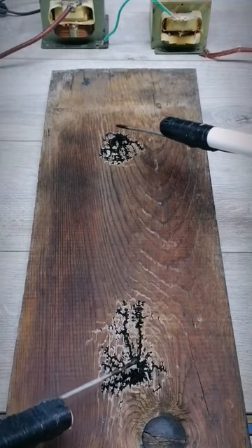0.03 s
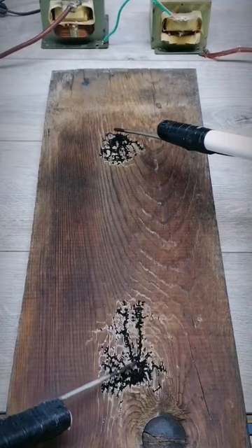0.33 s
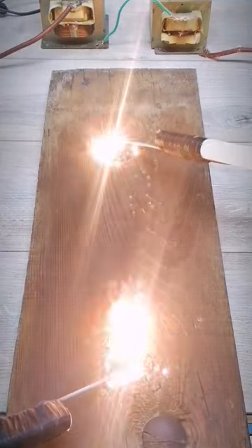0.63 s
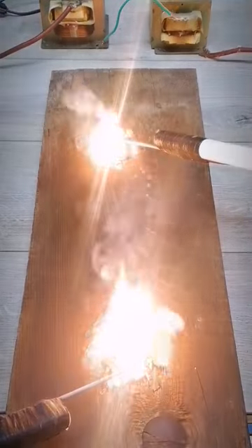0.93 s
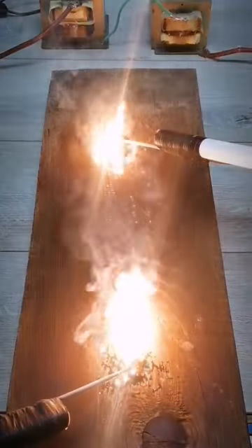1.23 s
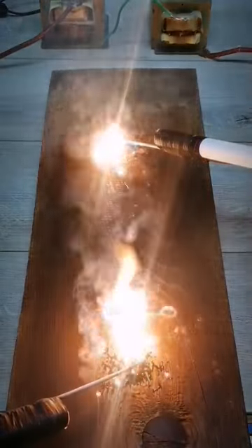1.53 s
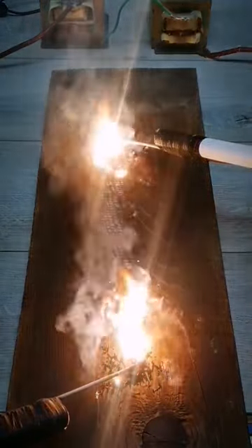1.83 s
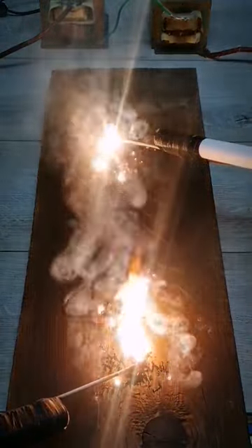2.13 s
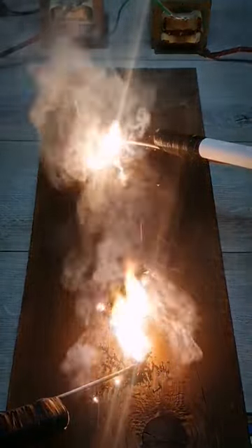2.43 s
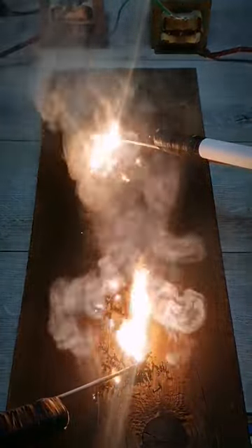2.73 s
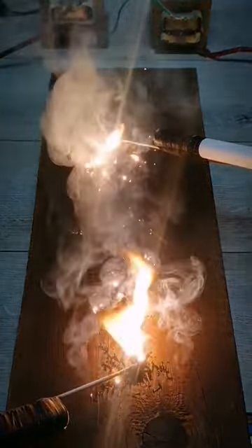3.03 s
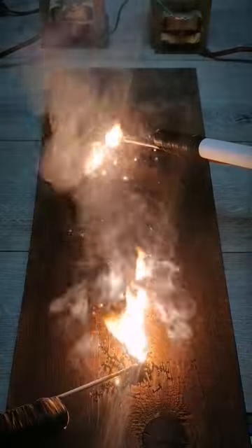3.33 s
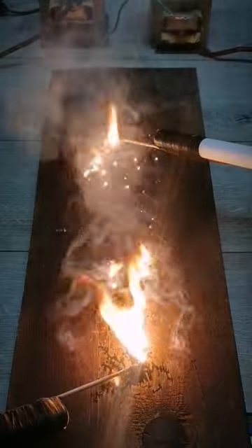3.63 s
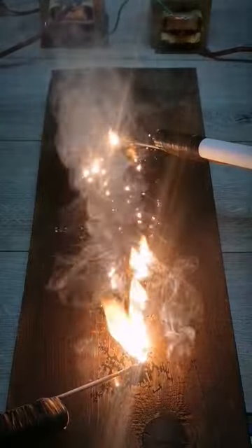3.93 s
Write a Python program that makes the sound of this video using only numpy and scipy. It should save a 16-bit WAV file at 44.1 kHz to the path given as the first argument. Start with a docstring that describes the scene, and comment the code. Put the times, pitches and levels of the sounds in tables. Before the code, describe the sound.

An electric arc burns a wooden board in a small workshop. At first there is only a faint transformer hum, with a few sparks at 0.6 seconds. At 0.8 seconds the arc strikes with sharp pops, which thin out by 1.5 seconds. A deep buzz, pulsing crackle and sizzle continue until the end at about 4 seconds, with soft gushes of burning gas between 2.2 and 3.1 seconds.

```python
"""A faint transformer hum and a few sparks from a probe come first, in a small workshop.
Then a high-voltage arc strikes a wooden board, and pockets of gas burst in a run of pops.
The arc flares on every half cycle of the mains, heating the air into a deep buzz and tearing at
the wood with a pulsing crackle. Boiling sap sizzles, and jets of burning gas gush now and then."""
import sys
import numpy as np
from scipy import signal
from scipy.fft import rfft, irfft
from scipy.io import wavfile

SR = 44100
rng = np.random.default_rng(int(sys.argv[2]) if len(sys.argv) > 2 else 0)


def to_wav(sig):
    """Store sig (one row per channel, or 1-D mono) as 16-bit WAV at the path in sys.argv[1].

    Samples outside -1..1 are clipped; the rate is SR.
    """
    pcm = np.clip(np.atleast_2d(sig), -1, 1) * 32767
    pcm = np.round(pcm).astype(np.int16)
    wavfile.write(sys.argv[1], SR, pcm.T)  # frames by channels


N = 176400
T = np.arange(N) / SR

MAINS_HZ = 50
STRIKE_S, CATCH_S, BUZZ_RISE_S = 0.815, 0.0066, 0.083  # the strike; rise times of burning and buzz
FLARE_S, CRACKLE_LAG_S = 0.0057, 0.000092  # place of the flare in each half cycle; the crackle follows

# strength of the arc (time [s], relative level [dB])
ARC_LEVEL = [(0.86, -34.5), (0.88, -47.5), (0.93, -40), (1.0, -43), (1.47, -37), (1.67, -39), (1.72, -44),
             (2.19, -42.5), (2.98, -43.5), (3.79, -46), (3.97, -45)]
# strength of the wood's crackling (time [s], relative level [dB])
BURN_LEVEL = [(.82, -43), (.85, -40.5), (.88, -49), (.92, -48), (1.0, -47.5), (1.07, -48), (1.17, -47.5),
              (1.25, -51), (1.45, -43.5), (1.59, -46.5), (1.77, -55), (2.03, -51.5), (2.36, -55),
              (2.39, -51.5), (2.56, -48), (2.7, -52), (2.77, -53.5), (2.88, -50), (3.08, -50), (3.3, -53.5),
              (3.7, -53.5), (4, -50.5)]
# strength of the sizzle and ticks (time [s], relative level [dB])
SIZZLE_LEVEL = [(0.83, -49.5), (1.03, -56), (1.07, -51), (1.27, -56), (1.29, -49), (1.32, -51), (1.51, -49),
                (1.8, -55.5), (1.83, -52.5), (1.96, -52.5), (2.05, -55), (2.29, -56.5), (2.41, -52.5),
                (2.44, -55.5), (2.8, -56), (3.07, -56), (3.14, -52), (3.23, -53), (3.28, -54.5),
                (3.52, -54.5), (3.65, -57), (3.98, -56)]


def amp(db):
    """Amplitude ratio of a level in decibels."""
    return 10 ** (np.asarray(db) / 20)


def unit(x):
    """Normalisation to rms 1."""
    return x / np.sqrt(np.mean(x ** 2) + 1e-20)


def curve(points):
    """Linear interpolation of a time table at every sample."""
    return np.interp(T, *np.transpose(points))


def read(points, hz):
    """Interpolation of a table on a logarithmic frequency axis."""
    f, value = np.transpose(points)
    return np.interp(np.log(hz + 1), np.log(f + 1), value)


def drift(hz):
    """Low-pass noise of rms 1: a random fluctuation up to the given rate."""
    f = np.fft.rfftfreq(N, 1 / SR)
    return unit(irfft(rfft(rng.standard_normal(N)) / (1 + (f / hz) ** 4), N))


def colour(x, points, size=4096):
    """Minimum-phase filtering with the given spectrum."""
    log_gain = np.log(amp(read(points, abs(np.fft.fftfreq(size, 1 / SR)))))
    taps = np.fft.ifft(np.exp(np.conj(signal.hilbert(log_gain)))).real[:size // 2]
    return signal.oaconvolve(np.atleast_2d(x), taps[None], axes=1)[:, :N]


def resonate(x, hz, width):
    """A damped resonator of peak gain 1 whose natural frequency may move."""
    turn = np.exp(2j * np.pi * np.cumsum(hz * np.ones(N)) / SR)
    pole = np.exp(-np.pi * width / SR)
    return 2 * (turn * signal.lfilter([1 - pole], [1, -pole], x / turn + 1e-18)).real


def diffuse(pair):
    """Diffuse field: two independent signals become partly coherent at low frequencies."""
    # likeness of left and right (frequency [Hz], coherence [0-1])
    coherence = [(20, 0.19), (50, 0.25), (100, 0.67), (300, 0.39), (600, 0.36), (1200, 0.32), (3000, 0),
                 (15000, 0)]
    size = pair.shape[1]
    a, b = rfft(pair)
    alike = read(coherence, np.fft.rfftfreq(size, 1 / SR))
    mid, side = a * np.sqrt((1 + alike) / 2), b * np.sqrt((1 - alike) / 2)
    return irfft(np.array([mid + side, mid - side]), size)


def workshop(x, near_db, tail_db, near_s=0.0015, size=16384):
    """Room response: direct sound, early reflections from board and bench, and short reverberation."""
    # reverberation of the room (frequency [Hz], time to fall 60 dB [s])
    decay_times = [(150, 0.34), (800, 0.15), (3000, 0.24), (9000, 0.29), (15000, 0.16)]
    t = np.arange(size) / SR
    near = diffuse(rng.standard_normal((2, size)) * np.exp(-t / near_s) * (t > near_s / 10))
    hz, age, bands = signal.stft(rng.standard_normal((2, size)), SR, nperseg=256)
    decay = amp(-60 * age / read(decay_times, hz)[:, None])
    tail = signal.istft(bands * decay, SR, nperseg=256)[1][:, :size]
    tail = diffuse(tail * np.minimum(t / 0.0048, 1))
    paths = (t == 0) + amp(near_db) * near / np.linalg.norm(near[0])
    paths += amp(tail_db) * tail / np.linalg.norm(tail[0])
    return signal.fftconvolve(np.atleast_2d(x), paths / np.linalg.norm(paths.mean(0)), axes=1)[:, :N]


def hopping(grains, spectrum, near_db, tail_db, near_s, count=3):
    """Multipath: the discharge hops between spots on the board, each with its own reflections."""
    spot = rng.integers(0, count, N)
    arrivals = sum(workshop(grains * (spot == k), near_db, tail_db, near_s) for k in range(count))
    return unit(colour(arrivals, spectrum))


def lit(rise_s):
    """Linear onset from 0 to 1 as the arc strikes."""
    return np.clip((T - STRIKE_S) / rise_s, 0, 1)


def flares(depth_db):
    """Amplitude modulation with one swell in every half cycle of the mains."""
    return amp(depth_db * np.cos(2 * np.pi * 2 * MAINS_HZ * (T - FLARE_S - CRACKLE_LAG_S)))


def snaps(per_s, spread_db):
    """Poisson process of tiny discharges, a few much larger than the rest."""
    size = amp(spread_db * np.minimum(rng.exponential(1, N), 4.5))
    return size * rng.choice([-1., 1.], N) * (rng.random(N) < per_s / SR)


def background():
    """Transformers hum at even mains harmonics until the arc loads them; the room rumbles throughout."""
    # idle hum (multiple of the mains frequency, level [dB])
    harmonics = [(4, -65.5), (6, -62.5), (8, -78), (12, -83.5), (16, -80.5), (20, -77.5), (22, -86),
                 (26, -96.5)]
    # ambient noise (frequency [Hz], relative level [dB])
    room_tone = [(20, 5.5), (55, 0.5), (90, -4), (150, -6.5), (250, -11.5), (400, -10.5), (700, -19),
                 (1000, -21), (1500, -27), (3000, -28.5), (6000, -34), (15000, -43.5)]
    hum = sum(amp(db + 0.5 * drift(6.6)) * np.cos(2 * np.pi * (round(k) * MAINS_HZ * T + rng.random()))
              for k, db in harmonics)
    air = unit(colour(diffuse(rng.standard_normal((2, N))), room_tone))
    return np.sqrt(2) * hum * (1 - lit(BUZZ_RISE_S)) + amp(-56.5) * air


def sparks():
    """Impulsive excitation: bright spits as the probe finds the wood set its metal ringing briefly."""
    # single sparks (time [s], relative level [dB], decay time [s])
    spits = [(0.611, -41, 0.0009), (0.6197, -48, 0.0016), (0.6255, -57, 0.0047), (0.6305, -57.5, .005),
             (0.64, -65, .004), (0.8133, -35, 0.00017), (0.833, -50, 0.001), (0.8358, -44, 0.0005)]
    # colour of a spark (frequency [Hz], gain [dB])
    spectrum = [(590, -34), (1000, -4), (1560, -11), (2530, -9), (4310, -6), (4890, -14), (5230, -0.5),
                (7260, -1), (15000, -10.5)]
    # modes of the probe (frequency [Hz], bandwidth [Hz], gain [dB])
    modes = [(2560, 120, -7), (3090, 64, -3), (4320, 150, 0), (5400, 63, 2), (6700, 300, -5),
             (7660, 130, 2), (9430, 130, -1)]
    envelope = sum(amp(db) * (T >= start) * np.exp(-abs(T - start) / decay) for start, db, decay in spits)
    spit = envelope * rng.standard_normal(N)
    ring = sum(amp(db) * resonate(spit, hz, width) for hz, width, db in modes)
    return amp(9.5) * workshop(colour(spit, spectrum) + ring, near_db=4, tail_db=1)


def roar():
    """Modulated low noise: the flame pushes the air unevenly from flare to flare."""
    # colour of the flame (frequency [Hz], relative level [dB])
    spectrum = [(30, -10), (80, -23), (112, 5), (133, 11), (175, -2), (230, 3), (330, -3.5), (600, -10),
                (2000, -57.5), (15000, -64)]
    puffs = colour(rng.standard_normal(N) * flares(depth_db=-1.5), spectrum)
    return amp(-14) * unit(puffs) * amp(curve(ARC_LEVEL)) * lit(CATCH_S)


def gushes():
    """Jet noise: burning gas swells and fades, with a throaty flutter at the flare rate."""
    # Gaussian swells (peak time [s], standard deviation [s], level [dB])
    swells = [(2.204, 0.061, -58), (2.59, 0.11, -52), (2.915, .045, -58.5), (3.1, 0.048, -58.5)]
    # colour of a jet (frequency [Hz], relative level [dB])
    spectrum = [(100, -42), (450, -4), (620, -9), (760, 4), (900, -4), (1030, -2), (1300, -8), (1900, -21),
                (2450, -13), (3200, -26), (15000, -56)]
    envelope = sum(amp(db) * np.exp(-0.5 * ((T - peak) / width) ** 2) for peak, width, db in swells)
    jet = colour(rng.standard_normal(N) * flares(depth_db=6.5), spectrum)
    return envelope * unit(workshop(jet, near_db=-0.5, tail_db=-11))


def sizzle():
    """Shot noise: sap boils and char splits in a fine bright fizz over a hiss."""
    # colour of the fizz (frequency [Hz], relative level [dB])
    spectrum = [(100, -32), (1000, -10.5), (2500, -1.5), (3600, 2), (4600, -2.5), (5400, 3.5), (6300, -2.5),
                (7600, 0.5), (8500, -3), (9500, -0.5), (11500, -9), (15000, -11)]
    fizz = unit(snaps(per_s=3600, spread_db=4.5)) + amp(-9.5) * rng.standard_normal(N)
    sound = hopping(fizz * flares(depth_db=1.5), spectrum, near_db=7, tail_db=11.5, near_s=0.0005)
    return amp(1.18) * sound * amp(curve(SIZZLE_LEVEL)) * lit(CATCH_S)


def ticks(lag_s=0.0012, jitter_s=0.0009):
    """Jittered pulse train: the arc snaps off after each flare, never quite on time or equally hard."""
    # colour of a tick (frequency [Hz], relative level [dB])
    spectrum = [(100, -25), (700, -0.5), (1500, 4), (3000, -1.5), (6000, -2.5), (9000, -11), (15000, -26)]
    beats = np.arange(0, N / SR, 1 / (2 * MAINS_HZ))
    late, size = rng.standard_normal((len(beats), 2)).T
    at = np.round((beats + FLARE_S + lag_s + jitter_s * late) * SR).astype(int) % N
    train = np.bincount(at, -amp(2.9 * np.minimum(size, 1.5)), N)
    sound = hopping(train, spectrum, near_db=6, tail_db=4.5, near_s=0.00067)
    return amp(-3.5) * sound * amp(curve(SIZZLE_LEVEL)) * lit(CATCH_S)


def sputter(wander=0.016):
    """Modal ringing: snaps in each flare excite the board, whose resonances shift as the arc creeps."""
    # modes of the board (frequency [Hz], bandwidth [Hz], relative gain [dB])
    modes = [(767, 70, -3), (1047, 50, -4), (1181, 30, 1.5), (1419, 57, 0), (2302, 79, -4), (2507, 46, -9)]
    grains = snaps(per_s=3000, spread_db=2) * flares(depth_db=9)
    ring = sum(amp(db) * resonate(grains, hz * (1 + wander * drift(4.6)), width)
               for hz, width, db in modes)
    sound = unit(workshop(ring, near_db=2.5, tail_db=-5))
    return amp(-6.5) * sound * amp(curve(BURN_LEVEL)) * lit(CATCH_S)


def pops():
    """Damped oscillation: each pocket of gas bursts with a brief swing of pressure."""
    # gas bursts (time [s], relative level [dB], frequency [Hz], rise time [s])
    bursts = [(0.6427, -47, 720, 0.0011), (0.8132, -32, 1400, 0.000089), (0.8238, -22.5, 1310, 0.00046),
              (0.8239, -26, 2900, 0.00021), (0.825, -30.5, 1900, 0.00045), (.8275, -38, 170, 0.0016),
              (0.8364, -26.5, 2310, 0.00017), (0.8373, -23.5, 1190, 0.0006), (0.8453, -24.5, 810, 0.00038),
              (.8454, -33, 2600, .0003), (0.88, -32, 800, 0.00072), (0.8875, -30, 875, 0.0002),
              (0.9455, -37, 1250, 0.00026), (.9458, -23, 704, 0.00055), (0.9483, -28, 212, 0.0015),
              (0.996, -33, 1500, .0002), (1.084, -36, 1450, 0.00095), (1.105, -33.5, 760, .0006),
              (1.1658, -26.5, 1150, 0.00021), (1.1845, -34, 650, .0005), (1.453, -30.5, 1160, 0.00066),
              (1.5435, -31, 2300, 0.00015), (2.3762, -33, 1590, 0.0002), (2.587, -33, 1500, 0.00012),
              (2.638, -32, 1900, 0.00011)]
    pressure = np.zeros(N)
    for start, db, hz, rise in bursts:
        age = np.maximum(T - start, 0)
        envelope = age / rise * np.exp(1 - age / rise)
        pressure += amp(db) * envelope * np.sin(2 * np.pi * hz * age)
    return amp(-3) * workshop(pressure, near_db=5, tail_db=-9.5)


def crackle():
    """Modulated shot noise: each flare tears at the wood with a cluster of snaps."""
    # colour of the snaps (frequency [Hz], relative level [dB])
    spectrum = [(100, -1.5), (250, 0), (350, -6), (520, -4), (750, 1.5), (950, -3.5), (1220, 0.5),
                (1500, -4), (1850, -8), (2350, -4.5), (2900, -11), (4000, -14), (7000, -16.5), (15000, -35)]
    grains = snaps(per_s=6500, spread_db=3) * flares(depth_db=5.6) * amp(0.7 * drift(100))
    sound = hopping(grains, spectrum, near_db=-1, tail_db=-2.5, near_s=0.0009, count=4)
    return amp(0.2) * sound * amp(curve(BURN_LEVEL)) * lit(CATCH_S)


def buzz():
    """Thermoacoustic tone: the arc heats the air twice per mains cycle; a stronger arc sounds harder."""
    # partials (multiple of the flare rate, relative level [dB], growth with the arc [dB/dB], waver [dB])
    partials = [(1, -0.5, 0.79, 0.24), (2, -5, 1.13, 1), (3, -18.5, 0.13, 1.45), (5, -27, 1.5, 1),
                (6, -26, 0.1, 4)]
    # the fourth partial swells and fades by itself (time [s], level [dB])
    fourth_level = [(.82, -69), (1.0, -58.5), (1.7, -59.5), (2.15, -62), (2.42, -59.5), (2.65, -71.5),
                    (2.8, -56), (3.15, -59), (4, -58.5)]
    level = curve(ARC_LEVEL)
    usual = np.median(level)
    phase = 2 * np.pi * (2 * MAINS_HZ * (T - FLARE_S) + 0.008 * drift(28))
    tone = sum(amp(usual + db + growth * (level - usual) + waver * drift(15.3)) * np.cos(round(k) * phase)
               for k, db, growth, waver in partials)
    fourth = amp(curve(fourth_level)) * np.cos(4 * phase)
    return -np.sqrt(2) * (tone + fourth) * lit(BUZZ_RISE_S)


def scene():
    """Superposition of all sources; a level difference leans each band left or right."""
    # stereo balance (frequency [Hz], left minus right [dB])
    balance = [(60, -.3), (100, -.6), (200, -1.2), (300, -.2), (450, 3), (740, 2), (1220, -6.5),
               (2000, -1.7), (3300, -2), (5500, .2), (9000, -2.8), (15000, -2)]
    mix = buzz() + roar() + gushes() + crackle() + sputter() + ticks() + sizzle()
    mix = mix + sparks() + pops() + background()
    lean = read(balance, np.fft.rfftfreq(N, 1 / SR)) / 2
    return irfft(rfft(mix) * amp([lean, -lean]), N)


def record(dry):
    """Band limiting: a linear-phase low-pass filter removes the highest treble."""
    low_pass = signal.firwin(401, cutoff=15200, window=("kaiser", 8), fs=SR)
    return signal.oaconvolve(dry, low_pass[None], "same")


dry = scene()
out = record(dry)
to_wav(out)
```